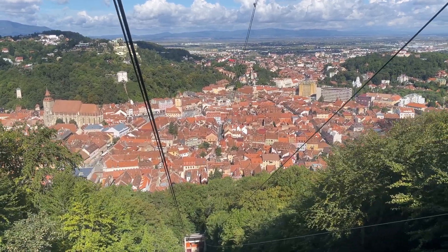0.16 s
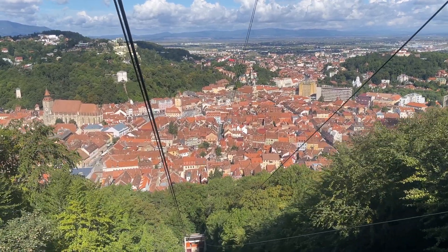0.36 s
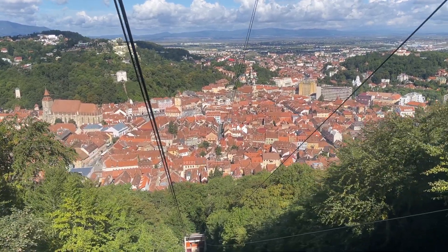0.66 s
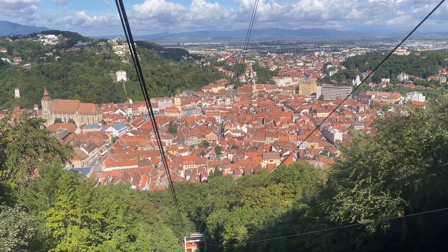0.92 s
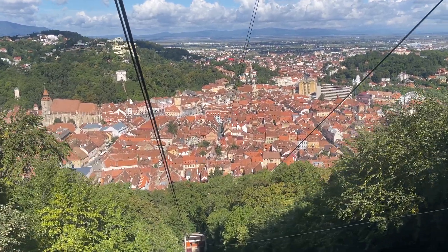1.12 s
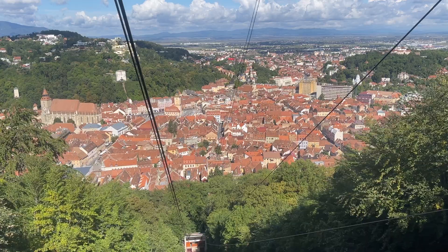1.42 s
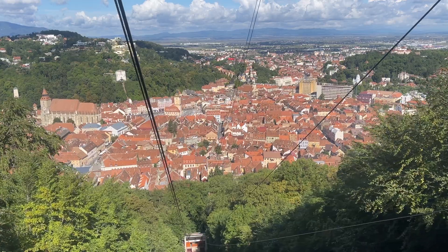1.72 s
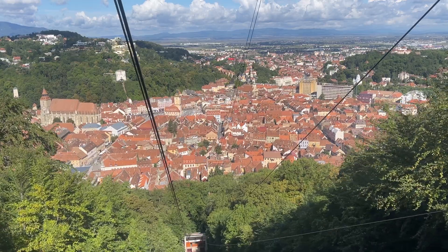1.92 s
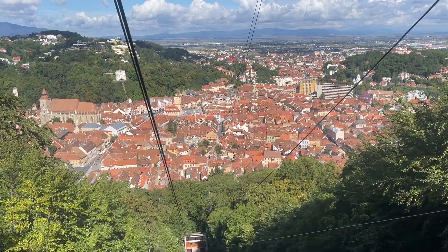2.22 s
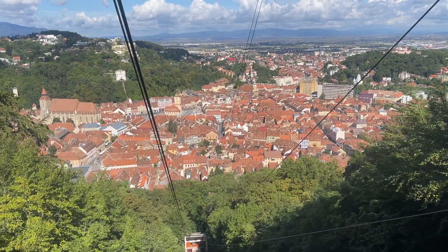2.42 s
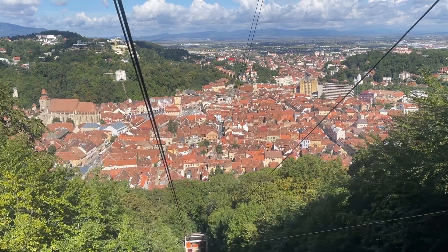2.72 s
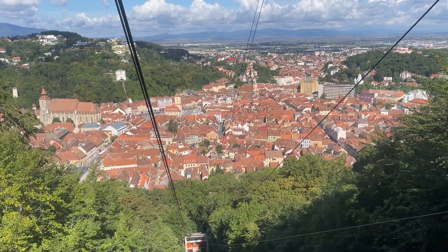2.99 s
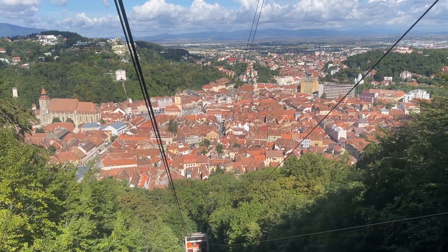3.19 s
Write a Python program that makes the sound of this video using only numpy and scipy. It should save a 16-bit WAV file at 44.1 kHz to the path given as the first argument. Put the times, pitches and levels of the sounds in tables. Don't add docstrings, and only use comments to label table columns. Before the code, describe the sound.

Low, boomy rumble of a moving cable car cabin, heard inside, ending with a latch click

```python
import sys
import numpy as np
from scipy import signal
from scipy.fft import rfft, irfft, next_fast_len
from scipy.io import wavfile

SR = 44100
rng = np.random.default_rng(int(sys.argv[2]) if len(sys.argv) > 2 else 0)


def unload_audio(sound):
    columns = np.transpose(np.atleast_2d(sound))
    steps = np.round(np.clip(columns, -1, 1) * 32767)
    wavfile.write(sys.argv[1], SR, steps.astype(np.int16))


def convert_level_to_amplitude(level_db):
    exponent = np.asarray(level_db, float) / 20
    return 10 ** exponent


N = 147735
PAD = next_fast_len(N + 8192)


def rms_one(x):
    return x / np.sqrt(np.mean(x ** 2) + 1e-20)


def in_time(rows):
    return np.interp(np.arange(N) / SR, *np.transpose(rows))


def at_hz(points, hz):
    table_hz, values = np.transpose(points)
    return np.interp(np.log(hz), np.log(table_hz), values)


def drift(rate):
    r = np.exp(-80 * np.pi * rate / SR)
    slow = signal.lfilter([1], [1, -2 * r, r * r], rng.standard_normal(N // 40 + 4002))[4000:]
    return np.interp(np.arange(N) / 40, np.arange(len(slow)), rms_one(slow - slow.mean()))


def coloured(spectrum, patchy_db, rate):
    hz = np.maximum(np.fft.rfftfreq(PAD, 1 / SR), 1)
    low, high = spectrum[0][0], spectrum[-1][0]
    shape = convert_level_to_amplitude(at_hz(spectrum, hz)) / (1 + (low / hz) ** 8) / (1 + (hz / high) ** 16)
    white = rfft(rng.standard_normal((2, PAD))) * shape
    together = drift(rate)
    out = 0
    for centre in 22 * 2. ** np.arange(10):
        if low / 2 < centre < 2 * high:
            patch = np.cos(np.pi / 2 * np.clip(np.log2(hz / centre), -1, 1)) ** 2
            flicker = convert_level_to_amplitude(patchy_db * (0.5 * together + drift(rate)))
            out = out + flicker * irfft(white * patch, PAD)[:, :N]
    return rms_one(out)


def resonance(x, hz, width_hz):
    r = np.exp(-np.pi * width_hz / SR)
    return signal.lfilter([1, 0, -1], [1, -2 * r * np.cos(2 * np.pi * hz / SR), r * r], x)


def ringing(hz, width_hz, shape=(2, N)):
    return rms_one(resonance(rng.standard_normal(shape), hz, width_hz))


def twice_ringing(hz, width_hz):
    return rms_one(resonance(ringing(hz, width_hz), hz, width_hz))


def burst(s, db, t60, attack, hold=0):
    t = np.maximum(np.arange(N) / SR - s, 0)
    fall_db = 60 * np.maximum(t - hold, 0) / max(t60, .02)
    return convert_level_to_amplitude(db - fall_db) * (1 - np.exp(-t / attack))


WHEEL_MULTIPLES = [7, 9, 13, 15, 16, 18, 19, 27, 29, 30, 33, 39, 40]
WHEEL_LEVELS = [-29.5, -22.5, -24.5, -22.5, -26, -35, -31, -36.5, -37.5, -41.5, -37.5, -37, -36]
# time in seconds, pitch in Hz, level in dB rms.
SAG_PARTIAL = [(0.049, 69.8, -21.5), (0.28, 68.63, -12.5), (0.49, 69.26, -22), (0.509, 69.06, -12),
               (0.81, 68.96, -23), (1.5, 68.9, -16.5), (2.389, 69.6, -22.5), (2.87, 66.88, -15.5),
               (3.28, 66.59, -17), (3.3, 64.1, -21)]
# time in seconds, gain in dB.
UPPER_GAIN = [(0, 2), (.6, 1), (.9, -4.5), (1.9, -5), (2.3, -0.5), (2.9, 4.5), (3.35, 3)]
# time in seconds, gain in dB.
TOP_GAIN = [(0, -8.5), (.3, -2), (.85, 1.5), (1.35, 3), (1.7, -8), (1.95, -2), (2.5, 2.5), (2.8, -7),
            (3.35, -6.5)]


def wheels():
    wheel_hz, wobble_db, wobble_per_s, slip_rad = 6.288, 2.5, 1.3, .7
    turn = 2 * np.pi * wheel_hz * np.arange(N) / SR
    upper_db, top_db = in_time(UPPER_GAIN), in_time(TOP_GAIN)
    s, hz, main_db = np.transpose(SAG_PARTIAL)
    main_phase = 2 * np.pi * np.cumsum(in_time(np.c_[s, hz])) / SR
    out = convert_level_to_amplitude(in_time(np.c_[s, main_db])) * np.sin(main_phase)
    for k, db in zip(WHEEL_MULTIPLES, WHEEL_LEVELS):
        level_db = db + wobble_db * drift(wobble_per_s)
        if 13 <= k < 21:
            level_db = level_db + upper_db
        if k >= 39:
            level_db = level_db + top_db
        slip = slip_rad * np.sqrt(k / 13) * drift(wobble_per_s)
        out = out + convert_level_to_amplitude(level_db) * np.sin(k * turn + rng.uniform(0, 2 * np.pi) + slip)
    return np.sqrt(2) * out


# time in seconds, level in dB.
LOAD = [(0.05, -17), (0.23, -17), (0.99, -15), (1.81, -16), (1.82, -15.5), (3.3, -17)]
# frequency in Hz, density in dB per Hz.
RUMBLE_COLOUR = [(12, -37), (30, -17), (62, -6.5), (100, -9), (140, -14), (245, -19.5), (300, -26.5),
                 (450, -45.5)]


def rolling():
    load = in_time(LOAD)
    rumble = convert_level_to_amplitude(load - 3) * coloured(RUMBLE_COLOUR, patchy_db=-1.0, rate=1.3)
    return rumble + convert_level_to_amplitude(load - load.mean()) * wheels()


# frequency in Hz, density in dB per Hz.
ROAR_COLOUR = [(190, -31), (330, -2.5), (415, -8), (573, -8), (648, -14), (1080, -17), (1410, -24),
               (1900, -31.5), (3200, -52.5), (4160, -73.5), (7040, -120)]
# time in seconds, level in dB.
ROAR_EFFORT = [(0.05, -44.5), (.47, -46.5), (.55, -40), (.68, -45.5), (0.94, -43.5), (1.15, -47),
               (1.16, -45), (1.67, -42), (2.0, -45.5), (2.22, -48.5), (2.3, -46.5), (2.45, -43),
               (2.56, -50), (2.61, -45.5), (2.82, -50.5), (2.86, -43.5), (3.07, -42.5), (3.15, -48.5),
               (3.25, -47)]
# frequency in Hz, width in Hz, level in dB.
PANEL_MODES = [(319, 17, -48.5), (589, 11, -52.5), (785, 80, -53.5), (1072.5, 37, -53.5), (1240, 34, -58.5),
               (1579, 26, -64), (1891, 28, -64)]


def roar():
    effort = in_time(ROAR_EFFORT)
    panels = sum(convert_level_to_amplitude(db) * ringing(hz, width_hz) for hz, width_hz, db in PANEL_MODES)
    hull = convert_level_to_amplitude(-38.5) * coloured(ROAR_COLOUR, patchy_db=2.19, rate=18.0)
    return convert_level_to_amplitude(effort - effort.mean()) * (hull + panels)


# start in seconds, peak level in dB, 60 dB decay time in seconds.
RATTLE_BURSTS = [(0.019, -50.5, 0.49), (0.216, -64.5, 0.27), (0.3623, -47, 0.24), (0.4385, -59, 0.3),
                 (0.5007, -50.5, 0.4), (0.527, -48.5, 0.31), (0.555, -51, 0.37), (0.61, -58.5, 0.27),
                 (0.637, -51.5, 0.24), (0.662, -55.5, 0.24), (0.7427, -47.5, 0.14), (0.772, -51.5, 0.12),
                 (0.8175, -71.5, 0.31), (0.844, -57, 0.22), (0.8694, -54.5, 0.24), (0.9807, -51, 0.15),
                 (1.002, -53.5, 0.14), (1.0388, -49.5, 0.19), (1.0884, -52.5, 0.39), (1.1533, -65, 0.38),
                 (1.222, -49.5, 0.26), (1.2505, -49.5, .4), (1.3497, -51.5, 1), (1.5653, -45, 0.42),
                 (1.7058, -52.5, 0.27), (1.8065, -49.5, 0.29), (1.8344, -50, 0.31), (2.0647, -59.5, .2),
                 (2.0912, -48, 0.27), (2.2225, -60.5, 0.3), (2.252, -53, 0.34), (2.3082, -50, 0.2),
                 (2.338, -51.5, 0.22), (2.4, -56, 0.35), (2.4425, -49, 0.25), (2.476, -54, .25),
                 (2.6171, -52, 0.19), (2.7223, -54, 0.31), (2.8336, -50, 0.68), (2.8961, -48.5, 0.73),
                 (2.941, -48, 0.25), (3.0274, -57, 1)]
# frequency in Hz, density in dB per Hz.
RATTLE_COLOUR = [(700, -3.5), (1500, 3), (2800, -3), (4400, -5.5), (6800, -6), (8600, -5), (10300, -1.5),
                 (11000, -8)]


def rattle():
    attack_s, hold_s, trim_db, grain_db = .002, 0.012, -6.5, 1
    power = sum(burst(s, db, t60, attack_s, hold_s) ** 2 for s, db, t60 in RATTLE_BURSTS)
    shake = np.sqrt(power) * convert_level_to_amplitude(trim_db + grain_db * drift(57.0))
    buzz = convert_level_to_amplitude(-9.5) * ringing(hz=4430, width_hz=220)
    squeak = twice_ringing(hz=5300, width_hz=1400)
    squeak = squeak * burst(.868, db=-56, t60=.2, attack=0.0047, hold=0.011)
    return shake * (coloured(RATTLE_COLOUR, patchy_db=0.3, rate=4.8) + buzz) + squeak


# start in seconds, peak level in dB.
LATCH_TICKS = [
    (3.2757, -44),
    (3.2792, -41),
    (3.2833, -31),
    (3.2898, -37),
    (3.2965, -46),
    (3.303, -50),
    (3.312, -48),
]
# frequency in Hz, level in dB, 60 dB decay time in seconds.
LATCH_MODES = [(580, 3, .1), (700, -1, .06), (1170, -7, .05), (2050, -5, .014), (2330, 3, .014),
               (3200, -13, .012), (3950, -7, .012), (4850, -9, .012), (5700, -12, .012), (6900, -8, .015),
               (8200, -10, .012), (9500, -9, .012), (11000, -10, .025), (11900, -20, .006)]


def latch():
    s, db = np.transpose(LATCH_TICKS)
    out = np.zeros((2, N))
    for hz, level_db, t60 in LATCH_MODES:
        clicks = np.full((2, N), 1e-18)
        spread_db = rng.normal(0, 3.5, (2, len(s)))
        strikes = convert_level_to_amplitude(db + level_db - 4.0 + spread_db) * rng.choice([-1, 1], len(s))
        clicks[:, (s * SR).astype(int)] = strikes
        r, w = convert_level_to_amplitude(-60 / (t60 * SR)), 2 * np.pi * hz / SR
        out += signal.lfilter([0, np.sin(w)], [1, -2 * r * np.cos(w), r * r], clicks)
    tail_colour = [(450, 1.5), (1500, 6.0), (3000, -7.5), (6000, -8), (10500, -9.5), (12300, -32.5)]
    tail = burst(s[0], db=-41, t60=0.28, attack=.006, hold=0.014)
    return out + tail * coloured(tail_colour, patchy_db=-1.5, rate=35.0)


# frequency in Hz, density in dB per Hz.
HISS_COLOUR = [(2000, -8.5), (3500, -6), (6000, -13), (8500, -8.5), (10300, 1), (11000, -17.5)]


def hiss():
    leak = twice_ringing(hz=9000, width_hz=3000)
    still = convert_level_to_amplitude(-75.5) * coloured(HISS_COLOUR, patchy_db=1.2, rate=5.0)
    return still + leak * burst(2.9, db=-61.5, t60=4.0, attack=.08)


def whine():
    centre_hz, split_hz, width_hz = 12000, 69, 22
    out = 0
    for hz in (centre_hz - split_hz, centre_hz + split_hz):
        out = out + rms_one(resonance(ringing(hz, width_hz, N), centre_hz, 330.))
    return convert_level_to_amplitude(-84) * out


# frequency in Hz, left-right likeness from 0 to 1.
PORT_LIKENESS = [(60, 0.99), (300, 0.9), (700, 0.42), (1300, 0), (2500, 0.4), (7000, 1), (8400, 0.92),
                 (12000, 0.95)]
# frequency in Hz, phase lead in radians.
PORT_LEAD = [(2200, 0), (2800, -.7), (8000, -.8), (8400, 0), (8900, .05), (10200, 3.14), (11000, 3.6),
             (11500, 6.28)]
# frequency in Hz, left over right in dB.
PORT_TILT = [(40, 0), (130, -1.7), (270, -2.2), (580, -.9), (1230, -2.8), (2400, 1.5), (5500, 3.4),
             (8200, 0)]


def ports(air):
    hz = np.maximum(np.fft.rfftfreq(PAD, 1 / SR), 1)
    alike = np.clip(at_hz(PORT_LIKENESS, hz), 0, 1)
    tilt = convert_level_to_amplitude(at_hz(PORT_TILT, hz) / 2)
    edge = 4096
    fade = np.clip(np.minimum(np.arange(PAD), PAD - np.arange(PAD)) / edge, 0, 1)
    padded = np.pad(air, ((0, 0), (edge, PAD - N - edge)), "reflect", reflect_type="odd")
    left, diffuse = rfft(fade * padded)
    right = alike * left * np.exp(1j * at_hz(PORT_LEAD, hz)) + np.sqrt(1 - alike ** 2) * diffuse
    return irfft(np.array([left * tilt, right / tilt]), PAD)[:, edge:edge + N]


def scene():
    air = rolling() + roar() + rattle() + latch() + hiss()
    return ports(air) + whine()


def band_limit(x):
    return signal.sosfilt(signal.butter(12, 12380, fs=SR, output="sos"), x)


def record(dry):
    peak_top, gain = .97, 0.92
    rounded = gain * peak_top * np.tanh(dry / peak_top)
    return band_limit(rounded)


dry = scene()
out = record(dry)
unload_audio(out)
```